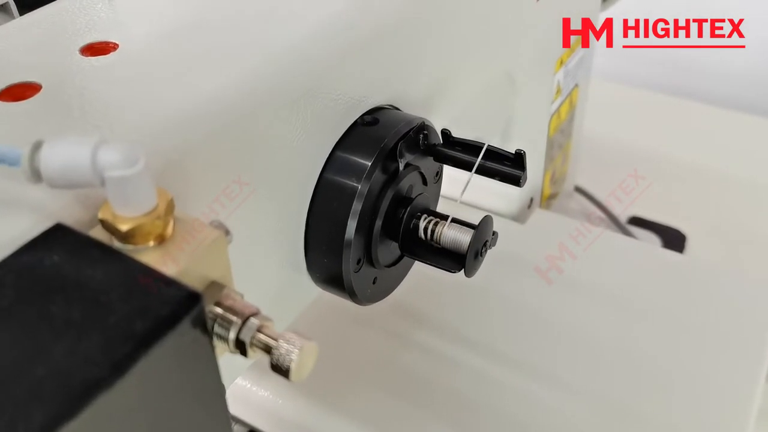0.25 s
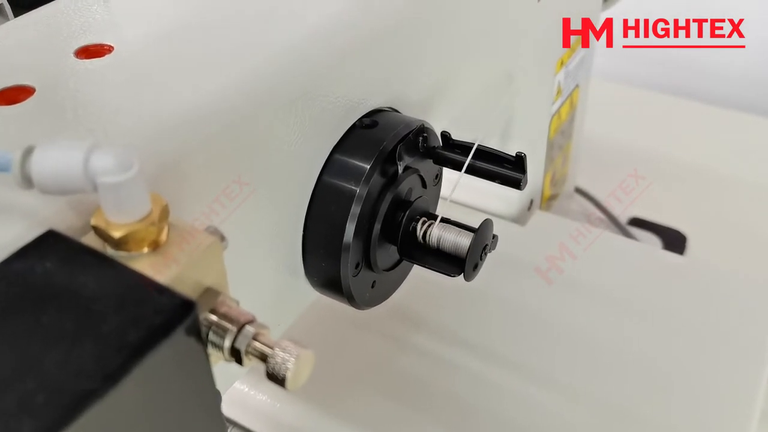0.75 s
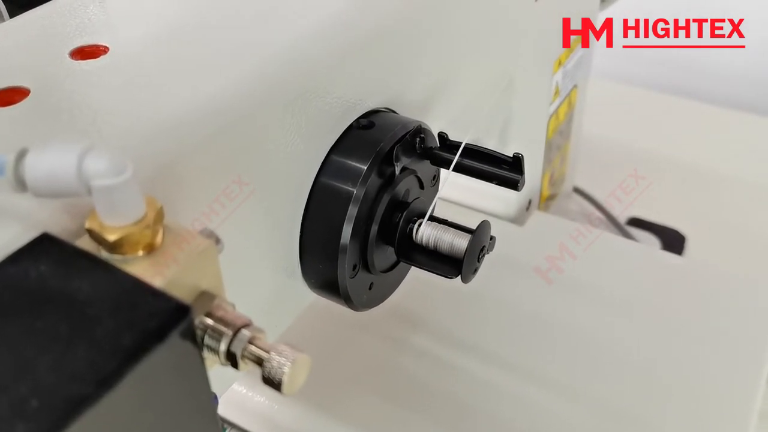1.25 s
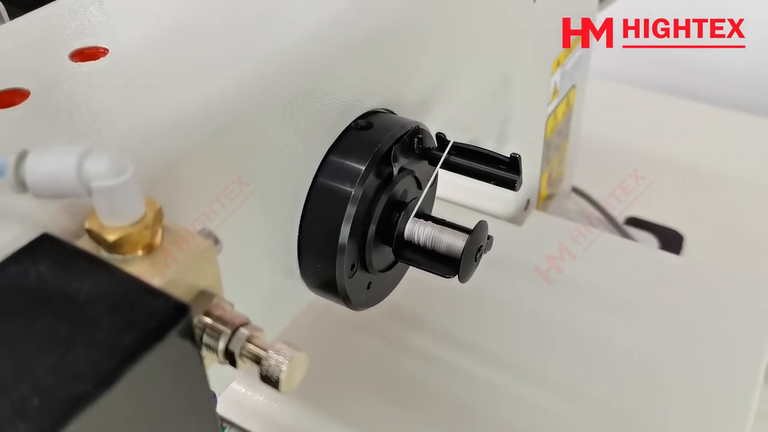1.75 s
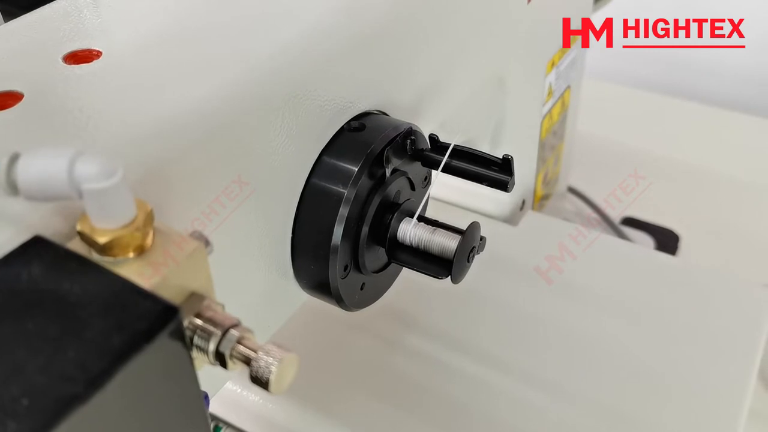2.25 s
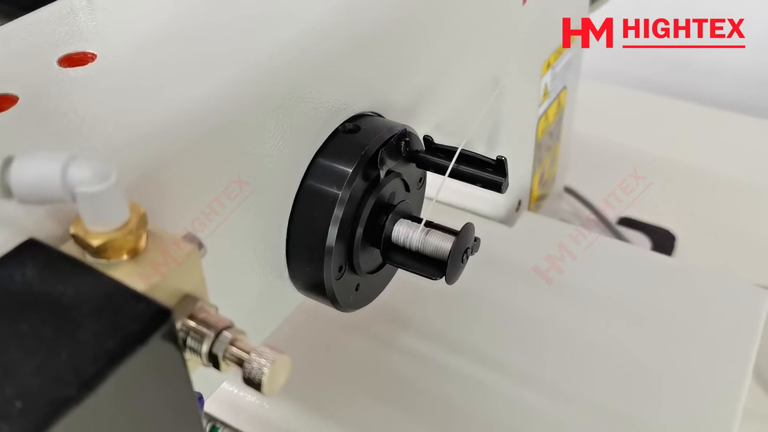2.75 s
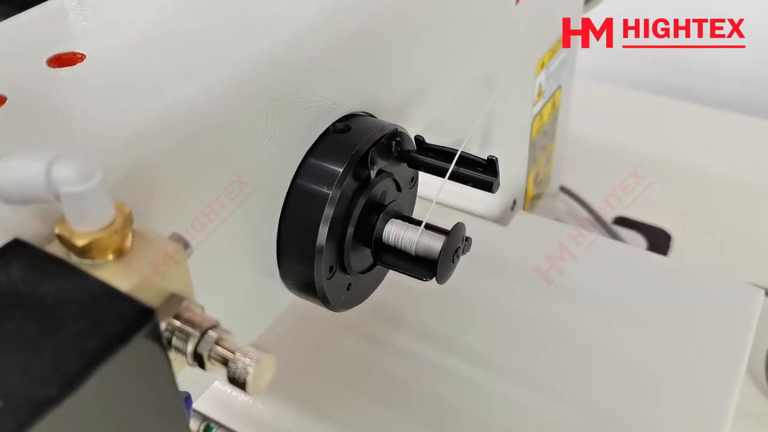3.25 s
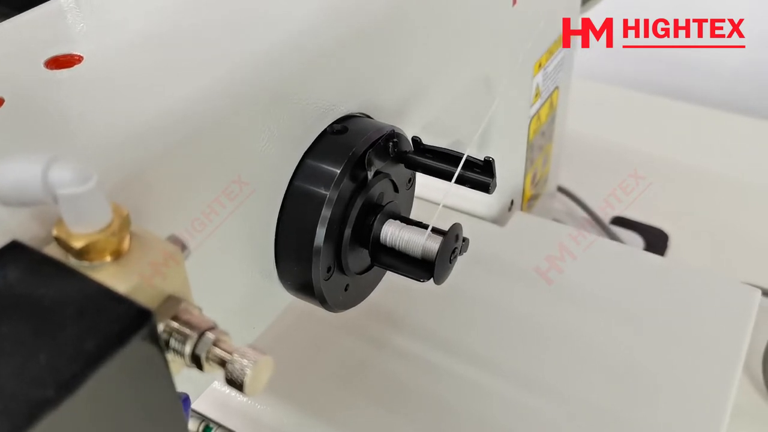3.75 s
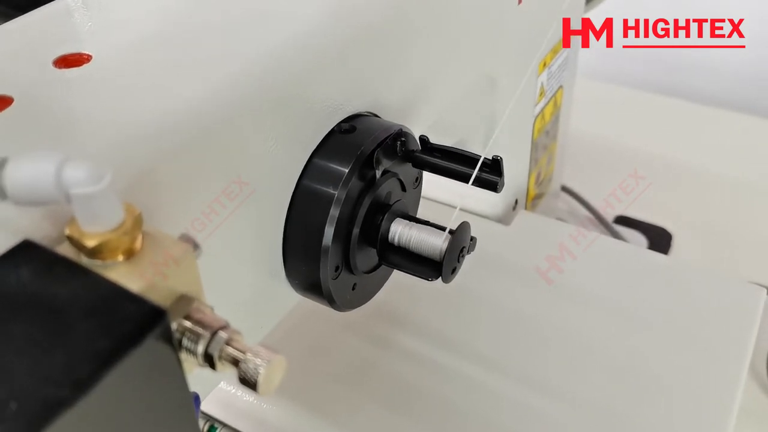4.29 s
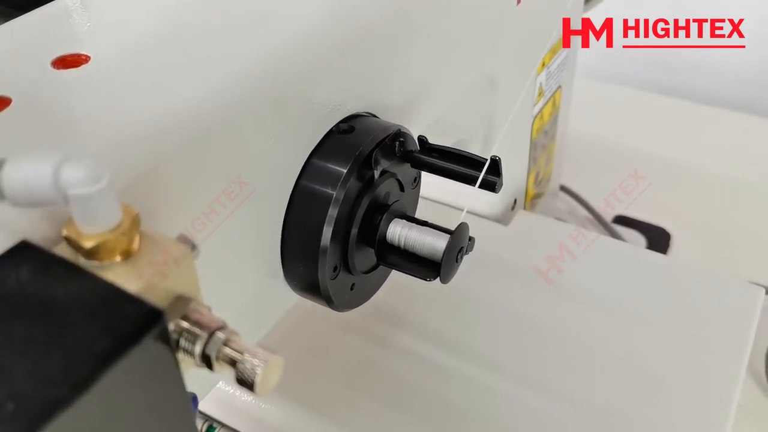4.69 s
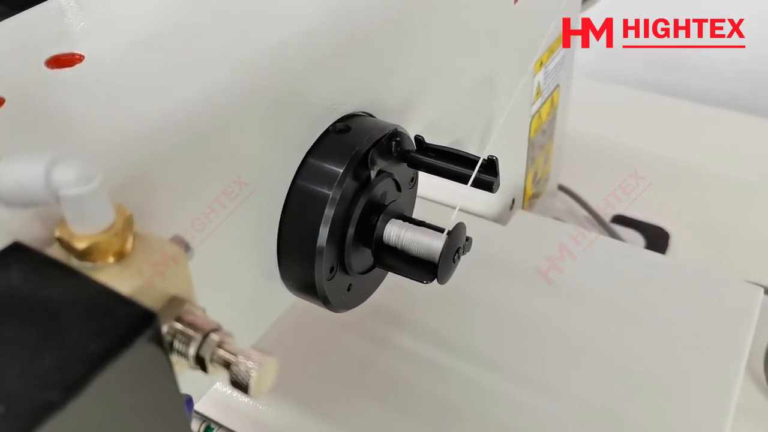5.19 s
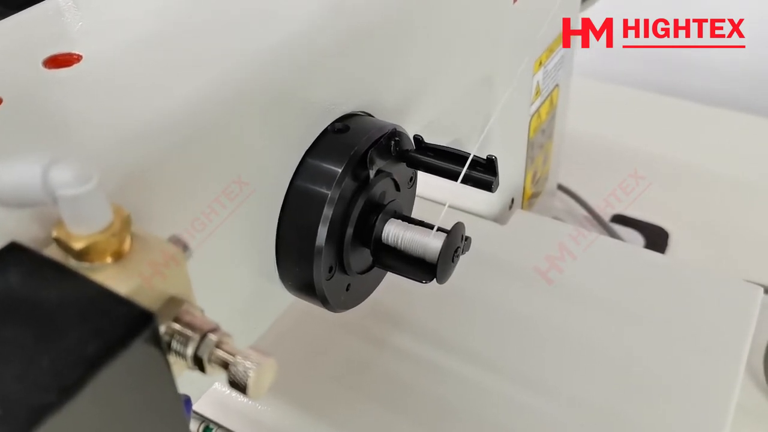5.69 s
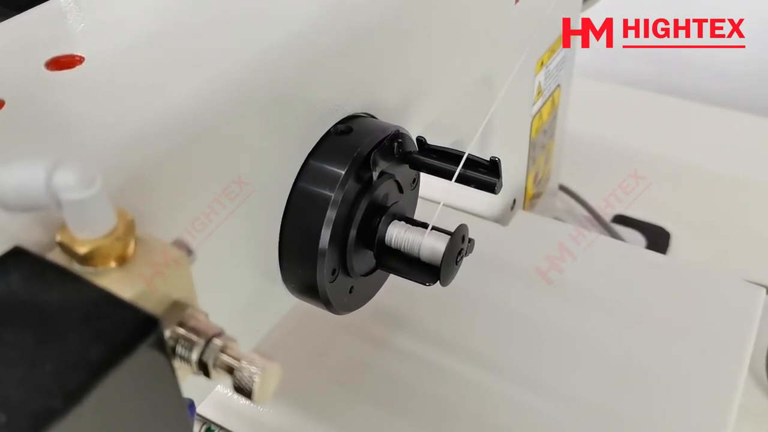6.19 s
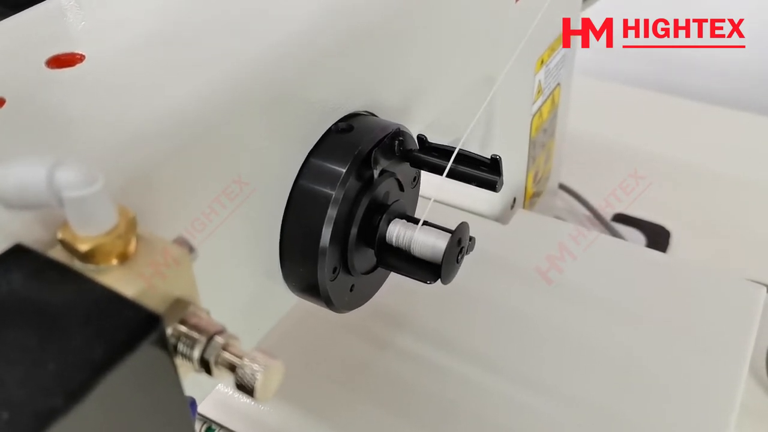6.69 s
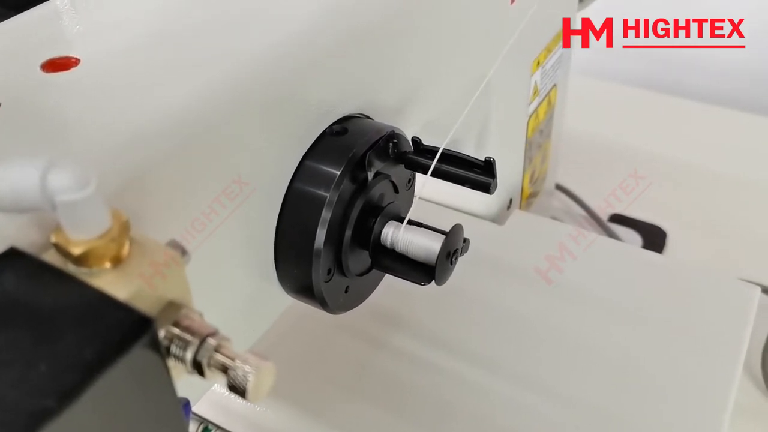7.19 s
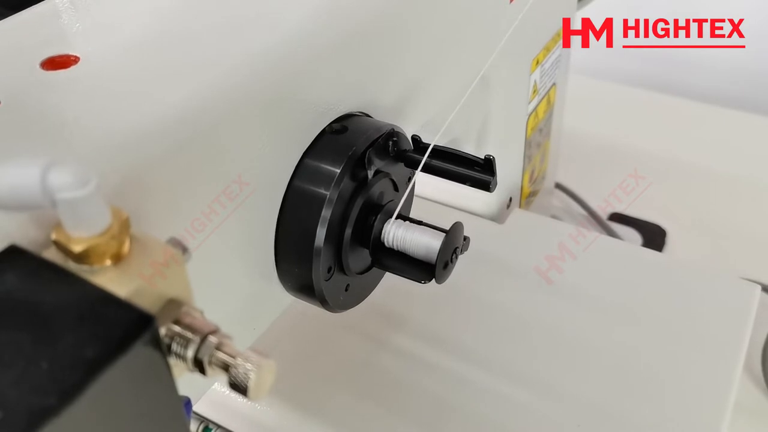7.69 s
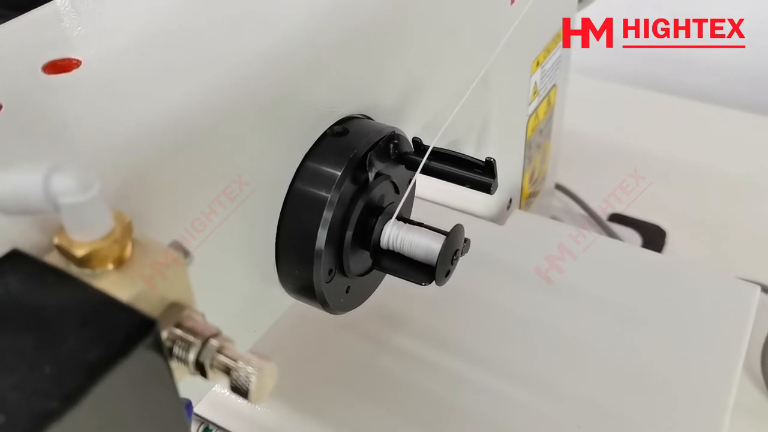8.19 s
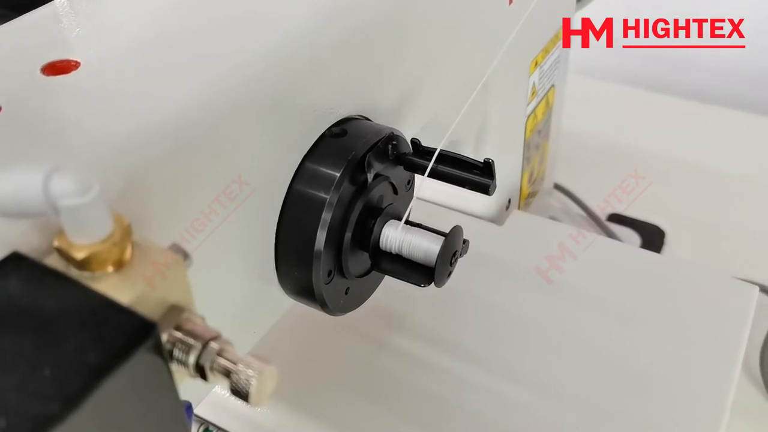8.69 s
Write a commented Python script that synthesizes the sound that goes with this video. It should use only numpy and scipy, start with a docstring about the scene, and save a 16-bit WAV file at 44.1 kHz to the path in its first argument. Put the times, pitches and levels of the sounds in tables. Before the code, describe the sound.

Fast, regular ticking and a bright metallic rattle run throughout as a sewing machine's winder spins a steel bobbin, heard close up in a workshop. Harder clacks come at uneven moments, mostly from the left, above whirring bearings, a faint motor whine and soft, low booms from the machine's body. As thread builds up, the clatter slowly softens and the thread swishes lightly, but the high ticking carries on.

```python
"""Sharp steel clacks over a quick, even knocking: a small motor winds thread on a loose bobbin.
The stereo microphone is close by, at a sewing machine head in a workshop, the bobbin to its left.
Every turn of the spindle repeats the same knocks and ticks, which ring the parts of the machine;
the rattle eases as thread builds up and damps it. Behind it the bearings whirr, the drive whines
and the frame booms softly."""
import sys
import numpy as np
from scipy import signal
from scipy.io import wavfile
from scipy.ndimage import uniform_filter1d

SR = 44100
rng = np.random.default_rng(int(sys.argv[2]) if len(sys.argv) > 2 else 0)


def generate_wav(sig):
    """Save sig (samples, or channels by samples) to the path in sys.argv[1] as 16-bit PCM at SR."""
    pcm = np.round(np.clip(np.atleast_2d(sig).T, -1, 1) * 32767).astype(np.int16)
    wavfile.write(sys.argv[1], SR, pcm)


N = 394254
TIME = np.arange(N) / SR
TURN_S = .14044   # one turn of the spindle


def amp(db):
    """Decibels to gain."""
    return 10 ** (np.asarray(db) / 20)


def rms_one(x):
    """Scale to rms 1."""
    return x / np.sqrt(np.mean(x ** 2) + 1e-20)


def at_hz(points, hz):
    """Read a table along log frequency."""
    freqs, values = np.transpose(points)
    return np.interp(np.log(hz), np.log(np.maximum(freqs, 1)), values)


def flicker(spread_db, per_s):
    """A gain that wanders by chance, spread_db about 1, at a pace set by per_s."""
    r = np.exp(-80 * np.pi * per_s / SR)
    slow = signal.lfilter([1], [1, -2 * r, r * r], rng.standard_normal(N // 40 + 2002))[2000:]
    gain = amp(spread_db * rms_one(slow - slow.mean()))
    return np.interp(np.arange(N) / 40, np.arange(len(slow)), gain)


def resonate(x, hz, width_hz):
    """One resonance with gain 1 on top."""
    r = np.exp(-np.pi * width_hz / SR)
    gain = (1 - r * r) / 2
    return signal.lfilter([gain, 0, -gain], [1, -2 * r * np.cos(2 * np.pi * hz / SR), r * r], x)


def dying(strikes, decay_ms):
    """Each strike starts a force that dies away."""
    return signal.lfilter([1], [1, -np.exp(-1 / (decay_ms * SR / 1000))], strikes + 1e-18)


def lean(db):
    """Gains at the microphone's two ports, the left louder by db."""
    return amp([[db / 2], [-db / 2]])


# how alike the two ports hear the machine: f/Hz, left-right correlation
PORT_LIKENESS = [(40, 0.72), (100, 0.91), (400, 0.91), (800, 0.69), (1500, 0.18), (3000, 0.25),
                 (6000, 0.044), (10000, 0.4), (14000, 0.33)]
def partly_alike(mid, side, hz):
    """Two unrelated signals blend into a left and a right that are partly alike."""
    alike = np.clip(at_hz(PORT_LIKENESS, hz), -.98, .98)
    return np.sqrt(1 + alike) * mid + np.sqrt(1 - alike) * side * np.array([[1], [-1]])


# left port over right: f/Hz, level/dB
LEFT_LOUDER = [(60, 3), (160, 1.5), (270, 0.5), (450, 2.0), (740, 5), (1220, 3), (2010, -1), (3330, 3.5),
               (5500, 8), (9080, 4), (15000, 2.5)]
# left port ahead of right: f/Hz, phase/rad
LEFT_AHEAD = [(0, 1), (780, -0.36), (1290, -0.6), (1550, -2), (2240, -1), (2930, 1.94), (3530, -2),
              (5080, 6.5), (6980, 3.5), (9990, 4.5), (10300, 1), (12800, 9), (15700, 5), (16500, 6.6)]
def at_ports(mid, side, hz):
    """This close, a pitch reaches the two ports at different levels and slightly apart in time."""
    left, right = partly_alike(mid, side, hz)
    lead = (at_hz(LEFT_AHEAD, hz) + np.pi) % (2 * np.pi) - np.pi
    right = np.roll(right, round(lead / (2 * np.pi * hz) * SR))
    return np.array([left, right]) * lean(at_hz(LEFT_LOUDER, hz)) / np.sqrt(2)


# thread building up on the bobbin: t/s, share of the full damping (0-1)
THREAD_FILL = [(0, 0), (1.2, .08), (4.0, .55), (7.0, .9), (8.94, 1)]
def filling(bare_db, full_db, s=TIME):
    """A level in dB that moves from its bare-bobbin to its full-bobbin value as thread winds on."""
    return bare_db + (full_db - bare_db) * np.interp(s, *np.transpose(THREAD_FILL))


def each_turn(ms, scatter_db):
    """When a point of the turn comes round (s), and how much stronger or weaker it is each time (dB)."""
    s = np.arange(int(N / SR / TURN_S)) * TURN_S + ms / 1000
    chance = rng.standard_normal((len(s), 2))
    return s + .00066 * chance[:, 0], scatter_db * np.clip(chance[:, 1], -2, 2)


def turn_blows(contacts):
    """Light blows of every turn, changing as the bobbin fills: t/s, level/dB, brightest f/Hz."""
    events = []
    for ms, bare_db, full_db, scatter_db, hz in contacts:
        times, chance_db = each_turn(ms, scatter_db)
        events += [(s, db, hz) for s, db in zip(times, filling(bare_db, full_db, times) + chance_db)]
    return events


def turning(contacts, rise_ms, rattles_per_s, rattle_db, push_db):
    """Mid and side force on a part: steady rubbing, the contacts of every turn and stray rattles."""
    turns = np.arange(-1, int(N / SR / TURN_S) + 1)
    scraping, pushes = np.zeros(N), np.zeros(N)
    for ms, db, scatter_db, decay_ms in contacts:
        chance = rng.standard_normal((len(turns), 2))
        at = np.round((turns * TURN_S + (ms + .45 * chance[:, 0]) / 1000) * SR).astype(int)
        inside = (at >= 0) & (at < N)
        strikes = np.zeros(N)
        strikes[at[inside]] = amp(db + scatter_db * np.clip(chance[inside, 1], -2, 2))
        scraping += dying(strikes, decay_ms)
        pushes += strikes   # each contact begins with one clean push
    stray = (rng.random(N) < rattles_per_s / SR) * amp(rattle_db + np.minimum(rng.exponential(1, N), 3))
    scraping += dying(stray, decay_ms=3.9)
    scraping = uniform_filter1d(scraping, size=int(rise_ms * SR / 1000))   # contacts take time to build
    into_turn_ms = TIME % TURN_S * 1000
    slack_db = -3 * np.exp(-.5 * ((into_turn_ms - 64) / 3.7) ** 2)   # once a turn the parts lift off
    rubbing = amp(slack_db + filling(0, -7)) * flicker(2.4, 8)
    rough = (rubbing + scraping) * rng.standard_normal((2, N))
    return rough + amp(push_db) * pushes * [[1], [.5]]


def body(force, modes, patchy_db, heavy=True):
    """A rough force rings the modes, now one and now another as the contact shifts; rms 1."""
    out = 0
    for k, (hz, width, db) in enumerate(modes):
        ring = resonate(force, hz, width)
        if heavy:   # a heavy part swells softly and is silent between its modes
            ring = resonate(ring, hz, 1.94 * width)
        gain = (-1) ** k * amp(db) / np.sqrt(width)
        out += gain * flicker(patchy_db, 9.7) * at_ports(*ring, hz)
    return rms_one(out)


def blows(events, modes, decay_ms, db_per_octave, gain_db, left_db, rise_ms=1.55):
    """Each blow drives the modes, the more weakly the further they lie from its brightest pitch."""
    times, levels_db, brightest_hz = np.transpose(events)
    at = np.minimum(np.round(times * SR).astype(int), N - 1)
    rough = rng.standard_normal((2, N))
    out = 0
    for k, (hz, width, db) in enumerate(modes):
        off_pitch_db = -db_per_octave * np.abs(np.log2(brightest_hz / hz))
        strikes = np.zeros((2, N))
        strikes[:, at] = amp(levels_db + off_pitch_db + db + gain_db) * lean(left_db)
        envelope = dying(strikes, decay_ms) + .096 * dying(strikes, 61)   # a rasp trails the blow
        envelope = dying(envelope, rise_ms) / (rise_ms * SR / 1000)
        push = amp(13) * strikes   # the clean start of the blow
        force = envelope * partly_alike(*rough, hz) + push
        out += (-1) ** k * np.sqrt(SR / width) * resonate(force, hz, width)
    return out


# spectrum of the bearings and the workshop air: f/Hz, relative level/dB
WHIRR_SPECTRUM = [(18, -53), (30, 3), (127, -32), (199, -20), (280, -35), (512, -7), (632, 8), (889, -32),
                  (988, -20), (1760, 9), (2290, 2), (4650, -47), (5740, -11), (6550, 1.5), (16000, -22)]
def bearing_whirr():
    """Bearings and air behind everything: half-octave bands of noise, each flickering on its own."""
    edges = 30 * 2 ** np.arange(0, 9.2, .5)
    white = rng.standard_normal((2, 2, N))
    out = 0
    for k, (low, high) in enumerate(zip(edges, edges[1:])):
        hz = np.sqrt(low * high)
        band = signal.sosfilt(signal.butter(2, [low, high], "band", fs=SR, output="sos"), white[k % 2])
        out += amp(at_hz(WHIRR_SPECTRUM, hz)) * flicker(4.5, 12) * at_ports(*band, hz)
    return amp(-56) * rms_one(out)


def tone(hz, db, waver_db, waver_per_s, wander_db, lead_rad):
    """A tone whose level and phase waver by chance, earlier at the left port."""
    phase = 2 * np.pi * hz * TIME + flicker(wander_db, 9.3)
    return np.sqrt(2) * amp(db) * flicker(waver_db, waver_per_s) * np.sin(phase + [[lead_rad], [0]])


# course of the drive's whine: t/s, level/dB
DRIVE_LEVEL = [(0, -52), (.6, -49.5), (1.5, -56), (2.2, -51), (2.8, -59), (3.5, -54.5), (5, -58),
               (6.8, -59), (7.3, -65), (8.94, -65)]
def drive_whine():
    """The drive's tone throbs twice a turn, with the faint whistle of its chopper far above."""
    throb_db = 6 * np.cos(4 * np.pi * (TIME - .064) / TURN_S)
    drive_db = np.interp(TIME, *np.transpose(DRIVE_LEVEL)) + throb_db
    drive = tone(974.5, drive_db, waver_db=4.5, waver_per_s=24, wander_db=9, lead_rad=1.3)
    chopper = tone(10000, -63.5, waver_db=1.5, waver_per_s=4.3, wander_db=5, lead_rad=.3)
    return drive + chopper


# frame resonances: f/Hz, width/Hz, level/dB
FRAME_MODES = [(90, 43, -1), (146, 27, 1), (191.5, 11.6, -0.5), (241.4, 14.4, -5.5), (284, 61, -0.5),
               (345, 27, -2), (428, 45, 1.5)]
# its contacts in every turn: t/ms, level/dB over the rubbing, scatter/dB, decay/ms
FRAME_CONTACTS = [(4.8, 3.5, -8, 44), (67, 10.5, -6.5, 3.3), (130.8, 17.5, -3, 2.5)]
def frame_rumble():
    """The turning parts keep the heavy frame rumbling."""
    force = turning(FRAME_CONTACTS, rise_ms=13.3, rattles_per_s=.3, rattle_db=3, push_db=19.5)
    return amp(filling(-59, -57.5)) * body(force, FRAME_MODES, patchy_db=4)


def boom(hz, length_s, attack_s=.012, lead_rad=.37):
    """The frame swings for a few cycles, a little off pitch, louder and earlier at the left port."""
    t = np.arange(int(length_s * SR)) / SR
    swell = np.sin(np.pi / 2 * np.minimum(t / attack_s, 1)) ** 2
    fade = np.cos(np.pi / 2 * (t / t[-1]) ** 1.8)
    phase, detune = rng.random(2)
    cycles = hz * (1 + .04 * (detune - .5)) * t + phase
    return swell * fade * np.sin(2 * np.pi * cycles + [[lead_rad], [0]]) * lean(1.5)


# shudders, about every third turn: t/s, level/dB of the first boom, the overtones, the deeper boom
FRAME_SHUDDERS = [(0.061, -49, -45.5, -55), (0.204, -46, -50, -54), (0.625, -44, -44.5, -41.5),
                  (1.046, -52, -56, -44), (1.467, -46, -59, -48), (1.751, -69, -49, -69),
                  (1.889, -45.5, -60, -58), (2.311, -44, -77, -56), (2.734, -48.5, -62, -56),
                  (3.149, -49, -72, -61), (3.578, -40.5, -62, -40.5), (3.989, -44.5, -59, -57),
                  (4.272, -43, -74, -61), (4.699, -42, -49.5, -39), (5.119, -47.5, -49, -37.5),
                  (5.402, -45, -58, -45.5), (5.825, -52, -53, -67), (6.39, -43.5, -42.5, -39),
                  (6.948, -46, -48, -40.5), (7.228, -66, -52, -67), (7.368, -44, -60, -38.5),
                  (7.651, -60, -51, -59), (7.786, -52, -55, -43), (8.207, -52, -57, -48.5),
                  (8.77, -70, -46, -54)]
# occasional higher booms: t/s, level/dB
FRAME_HIGH_BOOMS = [(1.234, -49), (4.202, -40.5), (5.902, -58), (7.984, -48.5), (8.405, -46), (8.704, -54)]
# faint booms in every turn: t/ms, level/dB, scatter/dB, f/Hz, length/s
FRAME_TURN_BOOMS = [(63.95, -63.5, 4.5, 242, 0.074), (63.92, -59.5, 4.5, 278, 0.088),
                    (64.4, -56.5, 6, 139, 0.038), (126.1, -58, 5, 101.4, 0.062)]
def frame_booms():
    """The shaken frame booms unevenly; a shudder is a boom with overtones, then a deeper boom."""
    events = [(s - .012, db, 187, .095) for s, db in FRAME_HIGH_BOOMS]   # t/s, level/dB, f/Hz, length/s
    for s, first_db, overtone_db, deep_db in FRAME_SHUDDERS:
        events += [(s, first_db, 132, .051), (s + .0636, deep_db, 103.5, .074)]
        events += [(s, overtone_db - 5, hz, .11) for hz in (242, 278)]   # a close pair that beats
    for ms, db, scatter_db, hz, length_s in FRAME_TURN_BOOMS:
        events += [(s, db + chance_db, hz, length_s) for s, chance_db in zip(*each_turn(ms, scatter_db))]
    out = np.zeros((2, N))
    for s, db, hz, length_s in events:
        start = max(int((s - .008) * SR), 0)
        burst = amp(db) * boom(hz, length_s)
        out[:, start:start + burst.shape[1]] += burst[:, :N - start]
    return out * flicker(3, 30)


# housing resonances: f/Hz, width/Hz, level/dB
HOUSING_MODES = [(530, 250, -6), (630.3, 33, -4), (769, 106, -1)]
# its contacts in every turn: t/ms, level/dB over the rubbing, scatter/dB, decay/ms
HOUSING_CONTACTS = [(45.8, 11.4, 0.68, 3.7), (54.1, 12, 2.4, 2.5), (62.9, 4.7, 2.6, 15),
                    (118, 9.1, 3.7, 7.8), (133, 8.1, 2.8, 11)]
# its hardest knocks: t/s, relative level/dB, brightest f/Hz
HOUSING_BLOWS = [(0.042, -45.5, 786), (0.264, -49, 789), (0.61, -57, 627), (0.685, -45, 797),
                 (0.75, -46, 630), (0.969, -47, 800), (1.036, -56, 630), (1.311, -40, 630),
                 (1.53, -49, 814), (1.95, -46, 794), (2.439, -57, 641), (2.58, -45.5, 630),
                 (3.072, -58, 807), (3.213, -45, 754), (3.7, -49, 610), (3.84, -46, 620), (4.686, -57, 630),
                 (4.759, -61, 751), (5.1, -45, 630), (5.243, -61, 640), (5.382, -64, 633),
                 (5.605, -49, 805), (6.014, -38, 604), (6.506, -48, 630), (7.489, -45.5, 633),
                 (7.631, -52, 630), (8.474, -45, 640), (8.69, -44.5, 790), (8.754, -45, 624),
                 (8.896, -47, 600)]
def housing():
    """The housing answers the turning with dull, hollow knocks."""
    force = turning(HOUSING_CONTACTS, rise_ms=5, rattles_per_s=10, rattle_db=8, push_db=25)
    running = amp(filling(-56.5, -61.5)) * body(force, HOUSING_MODES, patchy_db=4.5)
    knocks = blows(HOUSING_BLOWS, HOUSING_MODES, decay_ms=19.3, db_per_octave=45,
                   gain_db=-5.5, left_db=-1)
    return running + knocks


# cover resonances: f/Hz, width/Hz, level/dB
COVER_MODES = [(987.5, 49, -6.5), (1101, 78, -5.5), (1217, 68, -3.5), (1420, 140, -10.5), (1663, 210, -4.5)]
# its contacts in every turn: t/ms, level/dB over the rubbing, scatter/dB, decay/ms
COVER_CONTACTS = [(4.07, 6.7, 2.3, 11), (51, 4, 9.6, 2.9), (66, 2.7, 2.5, 3.7), (87.1, 2.8, 1.1, 10),
                  (117.3, 13.2, 1.2, 3.7), (122.84, 11, 1.7, 7), (137, 4.3, 2.6, 18)]
# its hardest knocks: t/s, relative level/dB, brightest f/Hz
COVER_BLOWS = [(0.119, -32, 977), (0.404, -36, 802), (0.542, -27, 980), (0.685, -27, 972),
               (0.965, -36, 1210), (1.105, -34, 977), (1.387, -39, 1150), (1.524, -36, 802),
               (1.596, -40, 974), (1.669, -32, 1220), (1.735, -29, 974), (1.808, -37, 964),
               (2.229, -29, 972), (2.51, -54, 977), (3.212, -41, 972), (3.773, -34, 972), (4.054, -42, 977),
               (4.192, -37, 974), (4.616, -31.5, 1000), (4.755, -35, 974), (5.458, -52, 974),
               (5.883, -36, 1250), (6.02, -37, 972), (6.16, -32, 972), (6.583, -34, 969), (6.864, -34, 974),
               (4.542, -34, 1460), (6.019, -33, 1680), (6.446, -38, 1260), (6.572, -30, 1650),
               (7.143, -29.5, 1620), (7.285, -36.5, 1280), (7.845, -34, 1320), (8.269, -39, 1230),
               (8.549, -31.5, 969), (8.69, -35, 969), (8.829, -43, 1210)]
def cover():
    """The cover is jolted in every turn and clatters in the midrange."""
    force = turning(COVER_CONTACTS, rise_ms=4, rattles_per_s=10, rattle_db=5.5, push_db=22)
    running = amp(filling(-49.5, -56.5)) * body(force, COVER_MODES, patchy_db=3)
    knocks = blows(COVER_BLOWS, COVER_MODES, decay_ms=17.4, db_per_octave=24, gain_db=-13.5, left_db=1.5)
    return running + knocks


# resonances of the taut thread and its guide: f/Hz, width/Hz, level/dB
THREAD_MODES = [(5440, 1030, -3), (7500, 1250, 1), (11800, 5000, -1.5)]
# its scrape in every turn: t/ms, bare level/dB, full level/dB, scatter/dB, brightest f/Hz
THREAD_SCRAPE = [(98, -60, -49.5, 4, 8500)]
# its clearest swishes: t/s, relative level/dB, brightest f/Hz
THREAD_SWISHES = [(6.0541, -36, 5100), (6.1948, -34, 5140), (6.3346, -34, 5140), (6.8982, -42, 5170),
                  (7.067, -37, 4910), (7.3482, -41, 5660), (7.97, -41, 5460), (8.3933, -38.5, 5100),
                  (8.612, -37, 5040), (8.6842, -47, 5080)]
def thread_swish():
    """The taut thread scrapes once a turn, louder as the bobbin fills."""
    events = list(THREAD_SWISHES) + turn_blows(THREAD_SCRAPE)
    return blows(events, THREAD_MODES, decay_ms=23.5, db_per_octave=5, gain_db=-9.5, left_db=2)


# thread guide resonances: f/Hz, width/Hz, level/dB
GUIDE_MODES = [(6230, 3300, -8), (9900, 2200, 6), (11490, 900, 1), (13000, 2400, -2), (15100, 2000, -1)]
# its contacts in every turn: t/ms, level/dB over the rubbing, scatter/dB, decay/ms
GUIDE_CONTACTS = [(16.4, 3, 1.6, 7.4), (40.6, 2, 1.6, 1.2), (48, 2, 2.3, 1.2), (77.4, 6.3, 1.5, 8.5),
                  (86, 20.1, 1.4, 3.6), (101, 3, 1.3, 11), (113, 2.6, 1.9, 39)]
def thread_guide():
    """The light guide hisses and ticks through its broad, high modes."""
    force = turning(GUIDE_CONTACTS, rise_ms=1.6, rattles_per_s=25, rattle_db=1.9, push_db=18)
    return amp(filling(-41.5, -43.5)) * body(force, GUIDE_MODES, patchy_db=1.3, heavy=False)


# lever resonances: f/Hz, width/Hz, level/dB
LEVER_MODES = [(2870, 230, 7), (3085, 50, -7)]
# its contacts in every turn: t/ms, level/dB over the rubbing, scatter/dB, decay/ms
LEVER_CONTACTS = [(40.3, 4, 2, 2), (48.6, 15.5, 1.8, 3.5), (56, 6, 1.5, 5), (68, 1.2, 2.3, 3.7),
                  (84.8, 3.4, 2.5, 2.5)]
# its hardest knocks: t/s, relative level/dB, brightest f/Hz
LEVER_BLOWS = [(0.0498, -22, 2870), (0.188, -24, 2850), (0.3293, -31, 2870), (0.4703, -35, 3060),
               (0.6105, -29, 2830), (0.892, -44, 2850), (1.0321, -25, 3110), (1.1717, -34, 3060),
               (1.3124, -35, 2890), (1.454, -45, 3060), (1.734, -36, 3040), (2.015, -46, 2850),
               (2.2952, -33, 3060), (2.4364, -28, 3040), (2.5765, -34, 2880), (2.7172, -40, 3060),
               (2.8574, -45, 2880), (3.5596, -35, 2840), (4.1233, -31, 2820), (4.542, -30, 2880),
               (4.6833, -30, 2940), (4.8237, -31, 2880), (5.1043, -51, 2890), (5.245, -35, 2880),
               (5.3842, -52, 2860), (5.666, -42, 2870), (7.0713, -36, 2850), (7.492, -44, 2870),
               (7.7727, -34, 2830), (8.4746, -46, 2860)]
def lever():
    """Short blows make the lever click near 3 kHz, the hardest a little right of the microphone."""
    force = turning(LEVER_CONTACTS, rise_ms=1.2, rattles_per_s=6, rattle_db=2, push_db=22)
    running = amp(filling(-43.5, -57.5)) * body(force, LEVER_MODES, patchy_db=1.2)
    knocks = blows(LEVER_BLOWS, LEVER_MODES, decay_ms=1.04, db_per_octave=23, gain_db=-13, left_db=-3)
    return running + knocks


# spindle resonances: f/Hz, width/Hz, level/dB
SPINDLE_MODES = [(1942, 52, -9), (2180, 113, -6), (2284, 43, -3.5), (2350, 320, -7), (2632, 72, -10)]
# its contacts in every turn: t/ms, level/dB over the rubbing, scatter/dB, decay/ms
SPINDLE_CONTACTS = [(2.91, 4, 1.7, 1.4), (16.37, 2.2, 1.2, 2), (51, 1.8, 0.92, 0.62), (65.4, 2.1, 2.2, 3.7),
                    (86.5, 3.3, 1.7, 5.7), (109.6, 7.8, 4.3, 2.1), (118.7, 2.7, 0.85, 4.9)]
# its hardest knocks: t/s, relative level/dB, brightest f/Hz
SPINDLE_BLOWS = [(0.1151, -26, 2210), (0.3321, -40, 2190), (0.3907, -20.5, 2240), (0.4718, -30, 2190),
                 (0.5062, -26, 2280), (0.8106, -40, 2290), (0.9507, -35, 2310), (1.0003, -25.5, 2240),
                 (1.2391, -55, 2170), (1.6307, -41, 2310), (1.795, -33, 2340), (1.8422, -32, 2160),
                 (1.945, -33, 1960), (2.2657, -26.5, 2250), (2.495, -27, 2180), (2.7766, -37, 2240),
                 (2.9262, -35, 2300), (3.06, -23, 2280), (3.2061, -38, 2200), (3.3375, -26, 2300),
                 (3.5603, -29, 2090), (4.0896, -31, 2180), (4.3226, -33, 2260), (4.7453, -33, 2260),
                 (4.8853, -34, 2320), (5.3057, -37.5, 2300), (5.4445, -28, 2150), (6.1974, -32, 2180),
                 (6.337, -42, 2200), (6.9002, -37, 2180), (7.4116, -39, 2250), (7.691, -33.5, 2240),
                 (7.972, -36.5, 2340)]
def spindle():
    """The spindle rubs and rings near 2.2 kHz, its hardest knocks a little right of the microphone."""
    force = turning(SPINDLE_CONTACTS, rise_ms=1.5, rattles_per_s=20, rattle_db=1.8, push_db=15)
    running = amp(filling(-41, -52)) * body(force, SPINDLE_MODES, patchy_db=2.5)
    knocks = blows(SPINDLE_BLOWS, SPINDLE_MODES, decay_ms=3.9, db_per_octave=34, gain_db=-5, left_db=-3)
    return running + knocks


# resonances of the bobbin's flange: f/Hz, width/Hz, level/dB
FLANGE_MODES = [(3220, 660, 1), (3410, 102, 0.86), (3683, 400, 0.23), (4300, 310, -0.5), (4947, 620, -1.7)]
# its contacts in every turn: t/ms, level/dB over the rubbing, scatter/dB, decay/ms
FLANGE_CONTACTS = [(16, 1.6, 1.5, 0.25), (47, 1.2, 1.3, 4.5), (84.1, 6.5, 0.46, 7.7),
                   (104.7, 3.7, 0.55, 4.4), (115, 4.3, 2.4, 5.5)]
def flange_rattle():
    """The light flange rattles freely at first, until the thread damps it."""
    force = turning(FLANGE_CONTACTS, rise_ms=1.5, rattles_per_s=13.2, rattle_db=.63, push_db=14)
    return amp(filling(-39.5, -57.5)) * body(force, FLANGE_MODES, patchy_db=1.5, heavy=False)


# steel bobbin resonances: f/Hz, width/Hz, level/dB
BOBBIN_MODES = [(6217, 460, -1), (6457, 427, 0.5), (6628, 260, 2.5), (6765, 790, -0.5), (7543, 200, -5),
                (8020, 510, -0.5), (8745, 320, -1), (9270, 600, -1.5), (10600, 230, -26),
                (11630, 890, -6.5)]
# its contacts in every turn: t/ms, level/dB over the rubbing, scatter/dB, decay/ms
BOBBIN_CONTACTS = [(14.9, 8.8, 2.5, 2.2), (31, 1.4, 1.3, 0.82), (40.4, 4.2, 0.97, 0.7), (47, 3.7, 4.2, 1.5),
                   (76.2, 3.5, 2.2, 1.1), (81.6, 6.2, 1.1, 4.1), (104, 4.5, 1.4, 2.7), (114, 4.3, 0.9, 7),
                   (130.3, 13.3, 1.7, 0.81)]
def bobbin_rattle():
    """Rubbing and many small contacts keep the loose steel bobbin ringing brightly."""
    force = turning(BOBBIN_CONTACTS, rise_ms=.6, rattles_per_s=32, rattle_db=.58, push_db=4)
    return amp(filling(-40, -39.5)) * body(force, BOBBIN_MODES, patchy_db=2.8)


# play taken up in every turn: t/ms, bare level/dB, full level/dB, scatter/dB, brightest f/Hz
BOBBIN_PLAY = [(84.6, -18.5, -24.5, 1, 6650), (104.5, -28, -33, 2, 7400), (112, -32, -32, 2, 6630)]
# the hardest clacks: t/s, relative level/dB, brightest f/Hz
BOBBIN_BLOWS = [(0.0867, -14.5, 6370), (0.2249, -20, 6740), (0.6464, -29, 6750), (0.6749, -30, 6600),
                (0.9492, -20, 7800), (1.2082, -21, 6200), (1.6302, -29, 6340), (1.7699, -16, 6320),
                (1.9116, -27, 6730), (1.9395, -32, 6600), (2.0507, -37, 6750), (2.4718, -25, 8800),
                (2.7546, -20, 8800), (2.9218, -24, 6560), (3.055, -19.5, 7660), (3.3368, -20, 6600),
                (3.455, -20, 8800), (3.7359, -27, 8760), (4.0926, -20, 8010), (4.4378, -34, 8790),
                (4.4895, -17, 6800), (5.032, -25, 6600), (5.443, -22, 7140), (5.775, -24, 8750),
                (6.058, -27, 6740), (6.4328, -24, 6550), (6.7136, -30, 6560), (7.1065, -37, 7400),
                (7.1347, -30, 6600), (7.668, -29, 6740), (7.8371, -21, 6540), (8.539, -44, 6690),
                (8.6802, -30, 6600), (0.388, -14.5, 6850), (1.003, -12.5, 7000), (1.0277, -18, 6940),
                (1.2371, -15, 6350), (1.5908, -7.5, 7100), (1.6511, -10, 6900), (1.8452, -11, 7000),
                (1.9829, -16, 6860), (2.2633, -13, 6340), (2.2927, -6.5, 7160), (2.3531, -16, 7050),
                (2.4942, -12, 7150), (2.7746, -11, 6360), (3.2031, -16.5, 6400), (3.5274, -12, 7000),
                (3.5573, -5, 7400), (3.905, -17.5, 6550), (3.9784, -13.5, 7100), (4.2592, -5.5, 7330),
                (4.4677, -13, 7240), (5.5832, -17, 7160), (5.8711, -19.5, 6470), (6.0112, -19, 6670),
                (6.1957, -20, 6800), (6.2257, -6.5, 7330), (6.8987, -21.5, 6730), (6.9945, -19.5, 6500),
                (7.0678, -12, 7600), (7.3492, -8, 7340), (8.6128, -10, 7380)]
def bobbin_clacks():
    """Nearer the left port, the bobbin takes up its play; each blow rings both it and its flange."""
    events = list(BOBBIN_BLOWS) + turn_blows(BOBBIN_PLAY)
    steel = blows(events, BOBBIN_MODES, decay_ms=2.04, db_per_octave=69.7, gain_db=-12, left_db=9)
    flange = blows(events, FLANGE_MODES, decay_ms=1, db_per_octave=34.5, gain_db=-18, left_db=9)
    return steel + flange


def scene():
    """The winder from close by, from the whirr at the back to the bobbin in front."""
    background = bearing_whirr() + drive_whine() + frame_rumble() + frame_booms()
    mechanism = housing() + cover() + thread_swish() + thread_guide() + lever() + spindle()
    bobbin = flange_rattle() + bobbin_rattle() + bobbin_clacks()
    return background + mechanism + bobbin


def record(dry):
    """The microphone dips near 1.65 kHz and cuts the top above 16 kHz."""
    dipped = dry - .7 * resonate(dry, hz=1648, width_hz=550)
    return signal.sosfilt(signal.ellip(12, .3, 85, 16150, fs=SR, output="sos"), dipped)


dry = scene()
out = record(dry)
generate_wav(out)
```